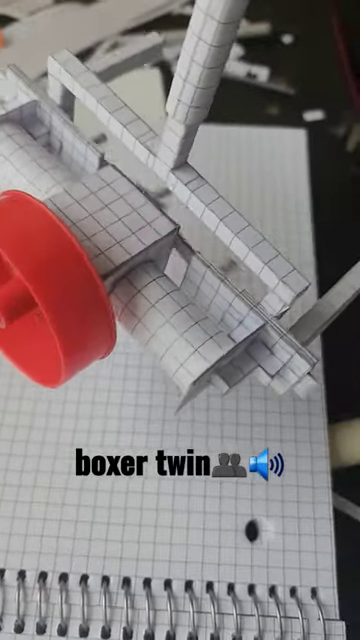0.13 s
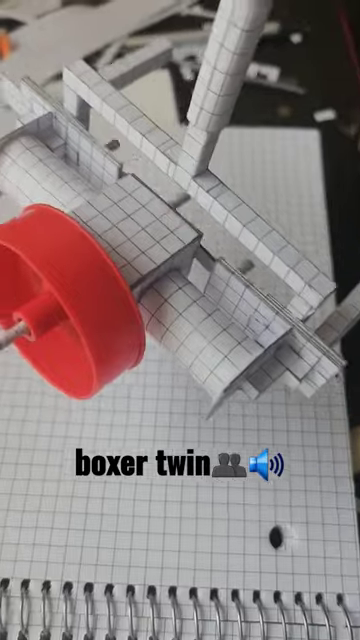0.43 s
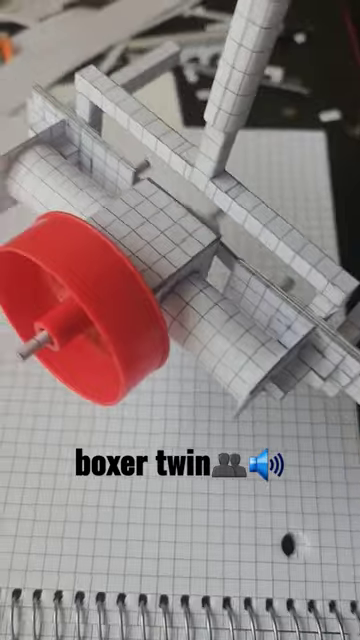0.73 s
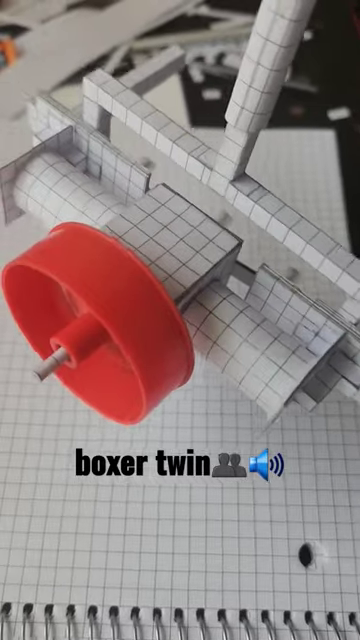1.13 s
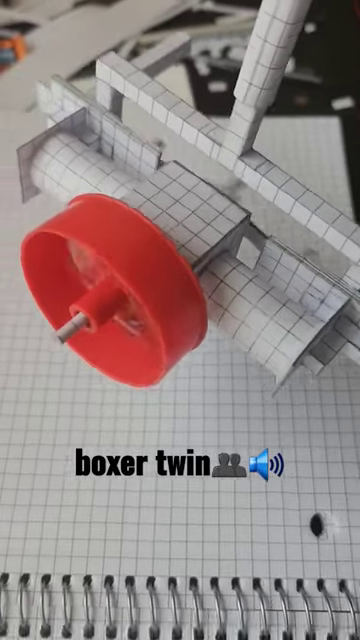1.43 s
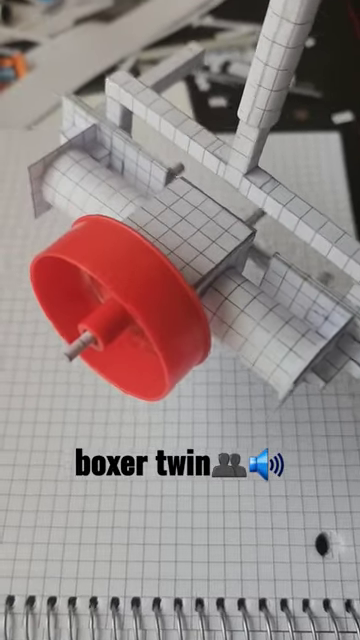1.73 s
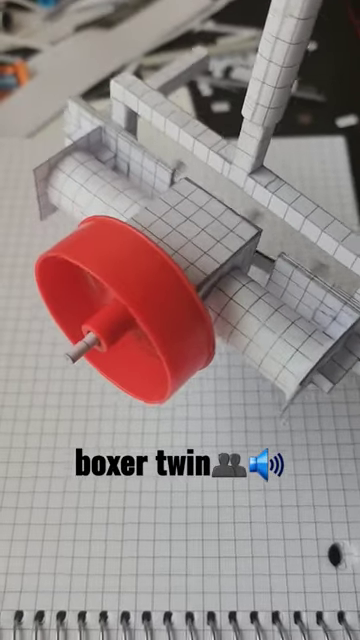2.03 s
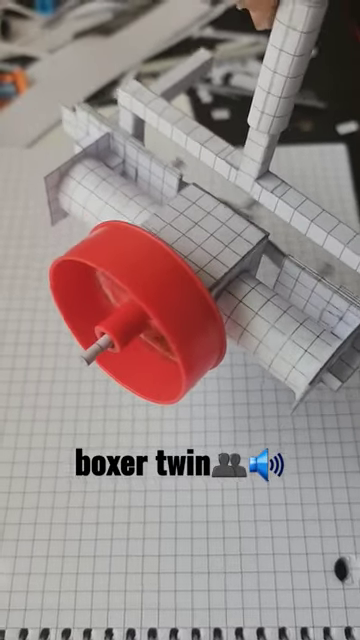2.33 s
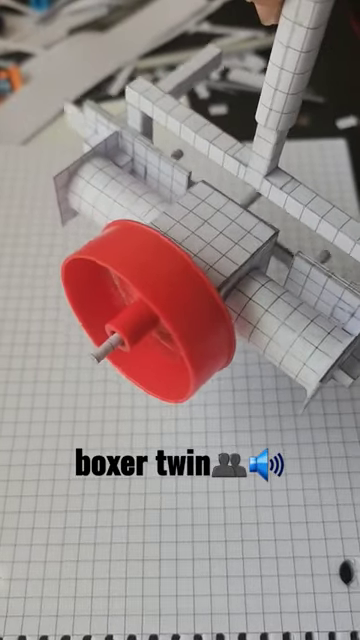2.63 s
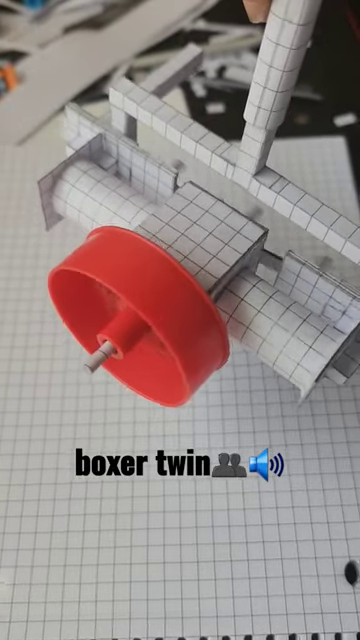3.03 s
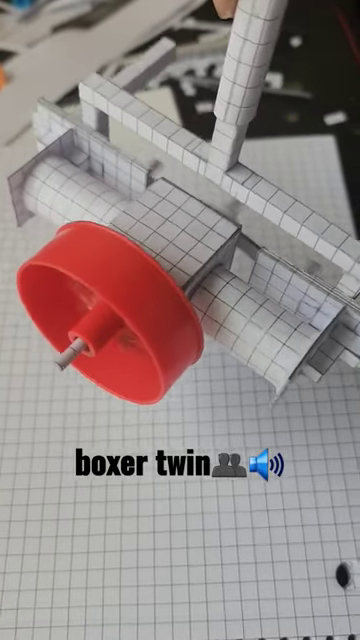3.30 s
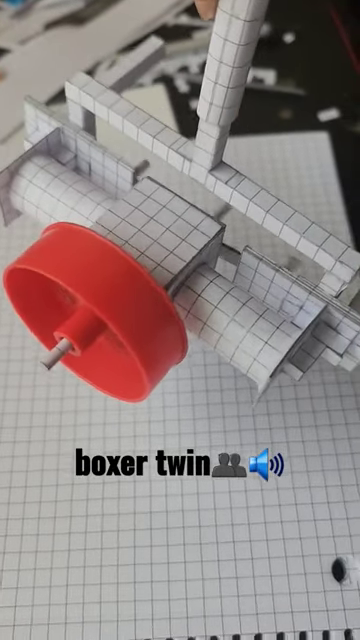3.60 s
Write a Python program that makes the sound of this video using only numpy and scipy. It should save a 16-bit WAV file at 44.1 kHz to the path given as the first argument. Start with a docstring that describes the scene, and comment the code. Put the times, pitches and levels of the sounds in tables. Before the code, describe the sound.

A small paper engine runs throughout, close up indoors, with rapid soft thumps, papery clatter, rasping pistons and hissing air. It slows and softens a little toward 1 second. From about 1.2 seconds the hiss swells and the engine speeds up, thumping harder with several dry snaps. After 2 seconds the hiss eases and the clatter gradually slows, still running at the end near 3.8 seconds.

```python
"""Rapid soft thumps and papery clatter: a two-cylinder paper engine running on a stream of air.
Each stroke gives a thump, a knock of the piston and a few loose rattles in the paper frame;
the pistons rasp in their tubes and the linkage snaps now and then. Air hisses through the valve.
A stronger gust speeds the flywheel up, then it slowly runs down. Heard close up in a small room."""
import sys
import numpy as np
from scipy import signal
from scipy.fft import rfft, irfft
from scipy.io import wavfile

SR = 44100
rng = np.random.default_rng(int(sys.argv[2]) if len(sys.argv) > 2 else 0)


def dump_mix(stems):
    """Bounce the given channels to the path in sys.argv[1] as a 16-bit WAV at rate SR."""
    frames = np.atleast_2d(stems).T  # one column per channel
    limited = np.clip(frames, -1, 1)  # hard clip at full scale
    pcm = np.round(limited * 32767).astype(np.int16)
    wavfile.write(sys.argv[1], SR, pcm)


N = 165816
TIME_S = np.arange(N) / SR
BIN_HZ = np.fft.rfftfreq(N, 1 / SR)


def amp(db):
    return 10 ** (np.asarray(db) / 20)


def unit_rms(x):
    return x / np.sqrt(np.mean(x ** 2) + 1e-20)


def curve(table, at_s, column=1):
    """One column of a control table at the times at_s."""
    table = np.array(table)
    return np.interp(at_s, table[:, 0], table[:, column])


def per_bin(points):
    """Spectrum points joined on a log-frequency axis."""
    hz, value = np.transpose(points)
    return np.interp(np.log(BIN_HZ + 1), np.log(hz), value)


def colour(x, tone):
    """Filters by a spectrum scaled to unit mean power."""
    return irfft(rfft(x) * unit_rms(amp(per_bin(tone))), N)


def high_pass(x, hz, order):
    return signal.sosfilt(signal.butter(order, hz, "high", fs=SR, output="sos"), x)


def band(x, hz, width_hz):
    return signal.lfilter(*signal.iirpeak(hz, hz / width_hz, SR), x)


def resonate(x, modes):
    return sum(amp(db) * band(x, hz, width_hz) for hz, width_hz, db in modes)


def add(mix, start_s, sound):
    start = round(start_s * SR)
    sound = sound[..., max(-start, 0):]
    part = mix[..., max(start, 0):][..., :sound.shape[-1]]
    part += sound[..., :part.shape[-1]]


def drift(scale_s):
    """Random wavering of unit size that changes over scale_s."""
    spectrum = rfft(rng.standard_normal(N)) * BIN_HZ * np.exp(-2 * (BIN_HZ * scale_s) ** 2)
    return unit_rms(irfft(spectrum, N))


# Likeness of the two microphone ports: freq_hz, correlation
PORT_LIKENESS = [(300, .96), (550, .7), (1500, .78), (2300, .1), (2700, .45), (3300, .1), (15000, .05)]
def port_noise():
    """White noise at both ports, alike in the bass and nearly unrelated in the treble."""
    left, other = rfft(rng.standard_normal((2, N)))
    likeness = np.clip(per_bin(PORT_LIKENESS), 0, 1)
    right = likeness * left + np.sqrt(1 - likeness ** 2) * other
    return irfft(np.array([left, right]), N)


# Flywheel speed: time_s, strokes_per_s
FLYWHEEL_SPEED = [(0.0, 21.11), (0.142, 27.66), (0.308, 28.48), (0.43, 27.17), (0.716, 24.56),
                  (0.959, 22.33), (1.114, 21.58), (1.225, 24.71), (1.289, 30.56), (1.389, 30.26),
                  (1.592, 31.08), (1.783, 32.17), (2.032, 32.23), (2.451, 28.51), (2.842, 27.07),
                  (3.239, 25.24), (3.48, 25.02), (3.76, 24.5)]
def stroke_count():
    """Crank position in strokes, one per half turn of the flywheel."""
    return np.cumsum(curve(FLYWHEEL_SPEED, TIME_S)) / SR - .402


def stroke_times():
    """The moments at which a piston reaches the end of its travel."""
    count = stroke_count()
    return np.interp(np.arange(int(count[-1]) + 1), count, TIME_S)


# One crank turn: position_strokes, valve_db, rub_db
CRANK_CYCLE = [(.08, .5, 0), (.33, -1.8, 0), (.6, -.5, 3.5), (.92, -4, -2.5), (1.17, 1.5, 2),
               (1.42, 1.8, .5), (1.6, -.5, -1.5), (1.74, 2.8, -1), (1.88, -4, -3)]
def crank_db(part):
    """Level swing of the valve air or the piston rub, repeated every turn."""
    position, valve, rub = np.transpose(CRANK_CYCLE)
    return np.interp(stroke_count(), position, {"valve": valve, "rub": rub}[part], period=2)


# Force of the strokes: time_s, thump_db, ring_db, clatter_db
STROKE_FORCE = [(0, 2.5, 0.5, 0), (.3, 0, 0.5, 0.5), (.7, -3, -2, -1.5), (1.06, -5, -5, -2.5),
                (1.3, 3.5, 6, -0.5), (1.6, 3, 6, -2), (1.9, 4, 3.5, 2), (2.3, 0, 0.5, 0),
                (3.0, 0, 0.5, -0.5), (3.76, -0.5, -1.5, 0)]
def force_db(part, at_s):
    """How hard the strokes drive one part of the sound."""
    return curve(STROKE_FORCE, at_s, {"thump": 1, "ring": 2, "clatter": 3}[part])


def room(x, t60_s=.11, reflections_per_s=2000):
    """A short tail of reflections from the desk and walls."""
    t = np.arange(SR // 3) / SR
    tail = rng.standard_normal((2, len(t)))
    tail *= rng.random(tail.shape) < reflections_per_s / SR
    tail *= (t > .004) * amp(-60 * t / t60_s)
    tail /= np.linalg.norm(tail, axis=1, keepdims=True)
    return high_pass(signal.fftconvolve(x, tail, axes=1)[:, :N], hz=480, order=2)


# Paper frame modes: pitch_hz, width_hz, level_db
FRAME_MODES = [(760, 125, 1), (1380, 530, -6.5), (2556, 180, -3), (4220, 1500, -6), (5370, 460, 0.5),
               (6540, 440, 4), (7540, 680, 6), (9200, 210, -1), (10600, 96, -12), (12000, 730, 10.5)]
def frame_ring(x):
    """The paper frame rings with whatever shakes it."""
    return resonate(x, FRAME_MODES)


# Turbulence spectrum: freq_hz, level_db
TURBULENCE_SPECTRUM = [(20, -5), (60, -14), (120, 0), (160, -5), (225, 2), (280, -3.5), (355, 0),
                       (400, 0.5), (450, -11.5), (900, -14.5), (16000, -80)]
def tube_rumble():
    """Low air turbulence in the tubes, following the force of the strokes."""
    return colour(port_noise(), TURBULENCE_SPECTRUM) * amp(-45.5 + force_db("ring", TIME_S))


# Air flow: time_s, hiss_db
AIR_FLOW = [(0, -34.5), (.2, -37.5), (.42, -41), (.74, -41), (.95, -44.5), (1.1, -42.5), (1.15, -35.5),
            (1.19, -33.5), (1.3, -30.5), (1.49, -28), (1.7, -29), (1.9, -34), (2.1, -36), (2.6, -37.5),
            (3.1, -39), (3.76, -39.5)]
# Valve hiss spectrum: freq_hz, level_db
HISS_SPECTRUM = [(30, -37), (500, -9.5), (1000, -6.5), (1450, -6.5), (2000, -4), (2600, 0), (3150, 0.5),
                 (4500, 0), (7500, 1), (9000, -0.5), (12000, -2.5), (16000, -7)]
def valve_hiss():
    """The air stream hisses, chopped by the valve, and lightly rings the frame."""
    waver_db = .5 * drift(scale_s=.05) + .8 * drift(scale_s=.003)
    flow_db = 4 + curve(AIR_FLOW, TIME_S) + crank_db("valve") + waver_db
    hiss = colour(port_noise() * amp(flow_db), HISS_SPECTRUM)
    return hiss + .24 * frame_ring(hiss)


# Sliding piston spectrum: freq_hz, level_db
RUB_SPECTRUM = [(30, -22), (300, -4), (550, 6.5), (800, -2.5), (1400, 4.5), (2000, 7), (3200, 4.5),
                (5500, -2), (7500, -29), (9000, -12), (16000, -22)]
def piston_rub():
    """The pistons rasp in their paper tubes, swelling with the crank and when driven hard."""
    rub_db = -40.5 + .29 * force_db("clatter", TIME_S) + crank_db("rub")
    rasp = colour(port_noise() * amp(rub_db), RUB_SPECTRUM)
    return .5 * (rasp + frame_ring(rasp))


# Linkage snaps: start_s, level_db, ring_share
LINKAGE_SNAPS = [(.0677, -13, .3), (.0745, -14, .6), (.2119, -22, .3), (.6953, -22, .3), (.7528, -17.5, .6),
                 (.9495, -24, .3), (1.0408, -26, .2), (1.1908, -21, .8), (1.2563, -16, .7),
                 (1.3279, -13, .6), (1.348, -17, .6), (1.7808, -16, .4), (1.7872, -15, 1.1),
                 (1.8419, -14, .7), (1.904, -16, .9), (1.9122, -20, 1), (2.7015, -23, .3), (2.816, -25, .6)]
# Crack spectrum: freq_hz, level_db
CRACK_SPECTRUM = [(100, -8), (1000, 0), (7500, 3.5), (15000, -9)]
def linkage_snaps(panel_hz=5360, rise_s=.0003, crack_decay_s=.0011, ring_decay_s=.0016):
    """The linkage catches and lets go: a dry crack, then a stiff panel rings briefly."""
    cracks, rings = np.zeros((2, 2, N))
    t = np.arange(SR // 40) / SR
    panel = 1.15 * np.exp(-t / ring_decay_s) * np.sin(2 * np.pi * panel_hz * t)
    for start_s, level_db, ring_share in LINKAGE_SNAPS:
        onset = amp(level_db) * (1 - np.exp(-t / rise_s))
        add(cracks, start_s, onset * np.exp(-t / crack_decay_s) * rng.standard_normal((2, len(t))))
        add(rings, start_s, onset * ring_share * panel)
    return colour(cracks, CRACK_SPECTRUM) + rings


def loose_rattles(rate_per_s=170, decay_s=.00097, spread_db=3):
    """Loose parts tap at random, each tap a tiny burst of noise."""
    hits = rng.random(N) < rate_per_s / SR
    scatter_db = spread_db * np.minimum(rng.standard_normal(N), 2)
    size = amp(-27.5 + force_db("clatter", TIME_S) + scatter_db)
    power = signal.lfilter([1], [1, -np.exp(-2 / (decay_s * SR))], hits * size ** 2)
    return port_noise() * np.sqrt(power)


def knock(panel_hz, decay_s, rise_s=.0005):
    """A short scrape of paper on paper; the struck panel rings at its own pitch."""
    t = np.arange(SR // 40) / SR
    shared, *per_port = rng.standard_normal((3, len(t)))
    noise = (shared + np.array(per_port)) / np.sqrt(2)
    burst = noise * (1 - np.exp(-t / rise_s)) * np.exp(-t / decay_s)
    return burst + 1.72 * band(burst, panel_hz, width_hz=1020)


# Contacts in every turn: cylinder, delay_s, jitter_s, level_db, decay_s, panel_hz
TURN_CONTACTS = [(0, -.0011, .0003, 1.5, .0014, 4400), (0, .0043, .0005, -5.5, .0018, 2700),
                 (1, .0006, .0005, -1.5, .0021, 6200), (1, -.0043, .0003, -7, .0008, 5400),
                 (1, .008, .0015, -8, .002, 1400), (1, .015, .003, -10, .002, 5400),
                 (0, .02, .003, -11, .002, 1400)]
def piston_knocks(strokes, spread_db=1.3, pitch_spread=.06):
    """Pistons and valve knock around each stroke, never quite alike."""
    knocks = np.zeros((2, N))
    for cylinder, delay_s, jitter_s, level_db, decay_s, panel_hz in TURN_CONTACTS:
        times = strokes[round(cylinder)::2]
        scatter = np.clip(rng.standard_normal((len(times), 3)), -2, 2)
        for stroke_s, (late, hard, sharp) in zip(times, scatter):
            gain = amp(-20 + level_db + force_db("clatter", stroke_s) + spread_db * hard)
            hit = knock(panel_hz * np.exp(pitch_spread * sharp), decay_s)
            add(knocks, stroke_s + delay_s + jitter_s * late, gain * hit)
    return knocks


# Paper impact spectrum: freq_hz, level_db
IMPACT_SPECTRUM = [(30, -26), (300, 9), (550, 0), (1000, 1.5), (2000, 4.5), (4000, -1.5), (7000, -2.5),
                   (9000, -2.5), (12000, -12), (16000, -30)]
def clatter(strokes):
    """Knocks and rattles sound directly and through the frame."""
    taps = colour(piston_knocks(strokes) + loose_rattles(), IMPACT_SPECTRUM)
    return .5 * (taps + frame_ring(taps))


# The two cylinders: thump_db, ring_hz, ring_db, extra_ring_db_per_force_db
CYLINDER_VOICES = [(-24.5, 255, -34.5, 1.06), (-24.5, 313, -30, -1.5)]
# Paper tube modes: pitch_hz, width_hz, level_db
TUBE_MODES = [(112, 32, -14), (201, 40, -10.5), (298.7, 22, -4.5), (354, 37, -11)]
# Tone of the thumps, a slight lift near 375 Hz, then a steep cut above: freq_hz, gain_db
THUMP_TONE = [(110, 0), (200, -2.5), (375, 2), (460, -8), (1000, -22)]
def cylinder_thumps(strokes, gulp_s=.0011, ring_rise_s=.0023, ring_decay_s=.0022):
    """The cylinders take turns to gulp air and ring briefly; the paper tubes hum on after."""
    gulps, rings = np.zeros((2, N))
    half = SR // 40
    t = np.arange(-half, half) / SR
    gulp_lead_s, ring_lead_s = .0001, .00074
    swell = np.where(t < 0, np.exp(-.5 * (t / ring_rise_s) ** 2), np.exp(-abs(t) / ring_decay_s))
    for k, stroke_s in enumerate(strokes):
        thump_db, ring_hz, ring_db, extra_ring = CYLINDER_VOICES[k % 2]
        gulp_scatter, pitch_scatter, ring_scatter = rng.standard_normal(3)
        drive_db = force_db("ring", stroke_s)
        excess_db = max(drive_db, 0)  # a harder stroke gulps longer and rings higher
        width_s = gulp_s * (1 + .025 * excess_db)
        gulp_gain = amp(thump_db + force_db("thump", stroke_s) + .5 * gulp_scatter)
        add(gulps, stroke_s - gulp_lead_s + t[0], -gulp_gain * np.exp(-.5 * (t / width_s) ** 2))
        pitch_hz = ring_hz * (1 + .04 * excess_db + .014 * pitch_scatter)
        ring_gain = amp(ring_db + drive_db + extra_ring * excess_db + .5 * ring_scatter)
        add(rings, stroke_s - ring_lead_s + t[0], -ring_gain * swell * np.cos(2 * np.pi * pitch_hz * t))
    blows = high_pass(gulps, hz=53, order=3) + rings
    hum = resonate(blows, TUBE_MODES)
    return irfft(rfft(blows + hum) * amp(per_bin(THUMP_TONE)), N)


def scene():
    strokes = stroke_times()
    mechanism = cylinder_thumps(strokes) + clatter(strokes) + linkage_snaps() + piston_rub()
    engine = mechanism + valve_hiss() + tube_rumble()
    return engine + amp(-10.5) * room(engine)


# Microphone port response: freq_hz, left_db, right_db
PORT_RESPONSE = [(92, .8, -.8), (125, 4, -4), (230, 2, -2), (700, 1.2, -1), (1420, 4.3, -4.5),
                 (2200, 1, -3), (2620, 4, -3), (2900, 2.2, -.7), (3400, .6, -3.4), (3900, 2.4, -.7),
                 (5700, 2, -1), (7250, 3, -5), (7800, .8, -.8), (8650, .8, -5), (10000, 2.8, -.5),
                 (12500, .5, -2.5), (15400, 4.5, -6)]
def record(dry, right_delay_s=.000194, cutoff_hz=15550):
    """Two band-limited ports, each with its own colour; the left is nearer, so louder and earlier."""
    left, right = (amp(per_bin([(row[0], row[k]) for row in PORT_RESPONSE])) for k in (1, 2))
    delay = np.exp(-2j * np.pi * BIN_HZ * right_delay_s)
    heard = irfft(rfft(dry) * np.array([left, delay * right]), N)
    low_pass = signal.firwin(511, cutoff_hz, window=("kaiser", 9), fs=SR)
    return signal.oaconvolve(heard, low_pass[None], "same")


dry = scene()
out = record(dry)
dump_mix(out)
```